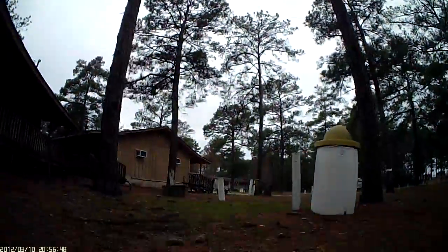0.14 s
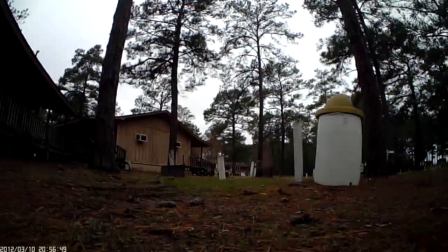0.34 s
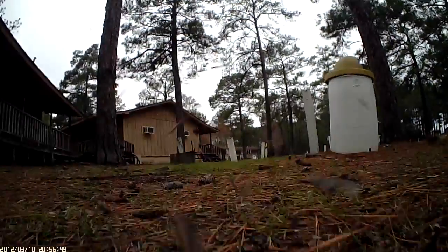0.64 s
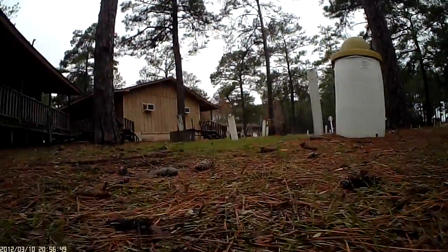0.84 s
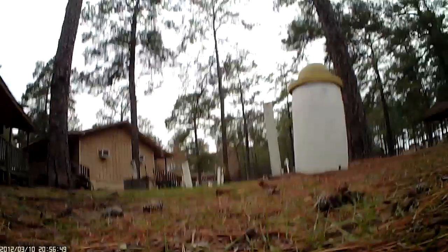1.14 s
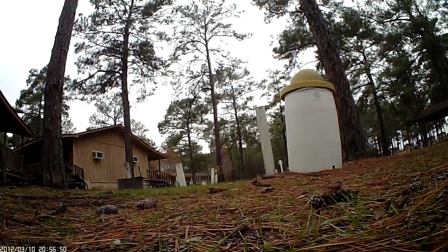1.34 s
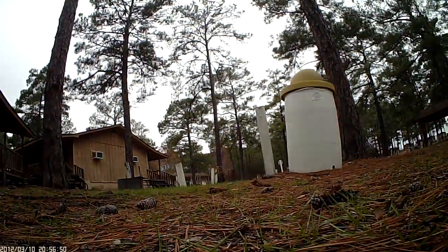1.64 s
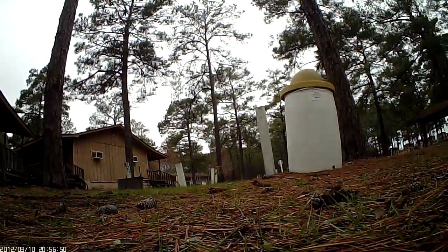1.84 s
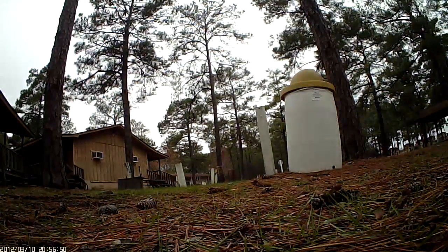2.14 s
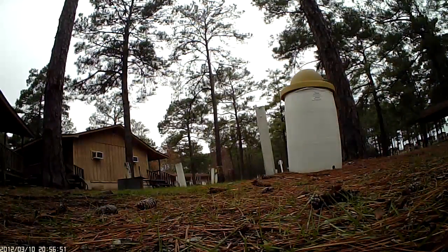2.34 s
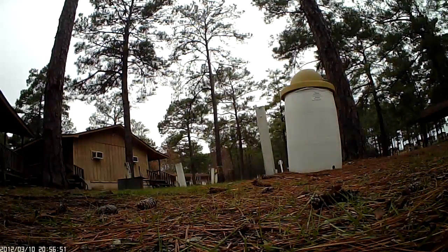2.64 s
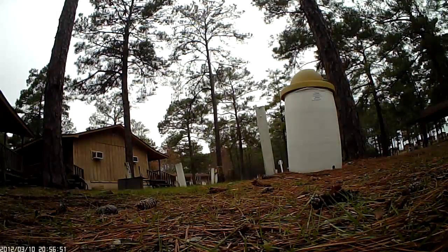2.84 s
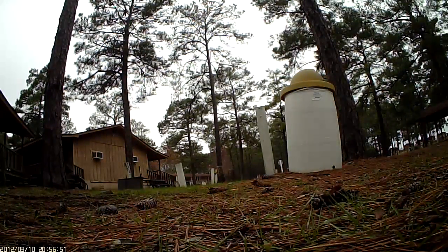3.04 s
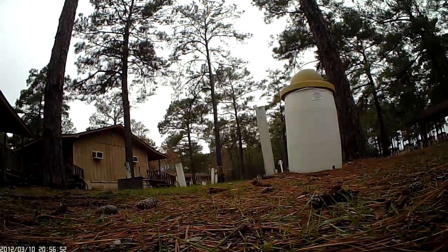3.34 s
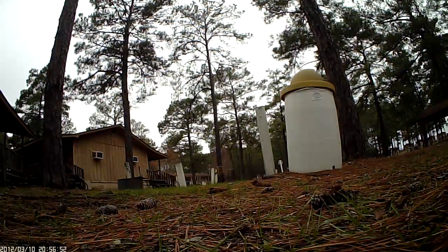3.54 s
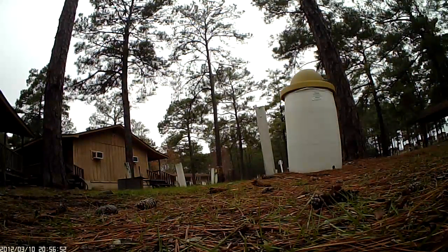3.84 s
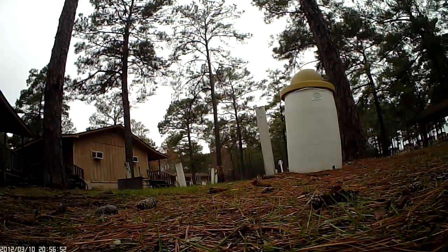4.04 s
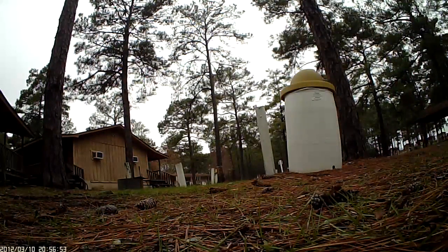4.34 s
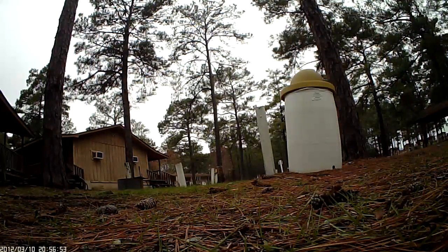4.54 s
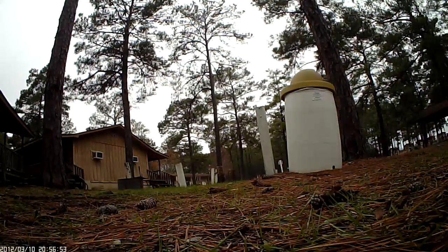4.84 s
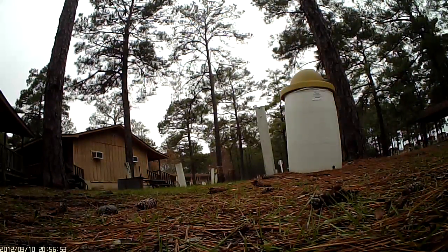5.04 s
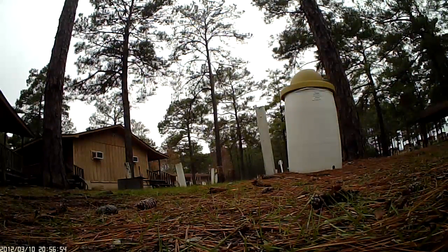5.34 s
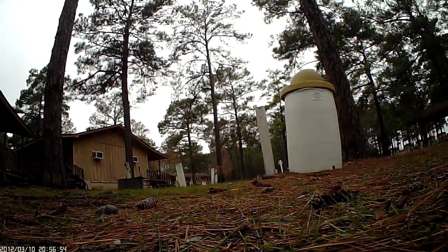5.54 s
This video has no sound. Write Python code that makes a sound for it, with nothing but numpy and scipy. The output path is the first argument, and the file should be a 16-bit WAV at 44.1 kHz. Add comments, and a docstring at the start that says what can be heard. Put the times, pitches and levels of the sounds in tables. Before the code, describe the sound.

A little multirotor lands on pine litter, recorded very close and dry through its own frame. Dissonant, nasal motor whine and airy propeller hiss come first, with thin chattering. Low knocks and a burst of gritty noise mark touchdown, followed by a rapid fall in pitch, a smaller second knock and brittle ticks. The bearings whirr down and stop, leaving a long quiet stretch of low, even electronic buzzing, faint hum and soft hiss.

```python
"""Small multirotor landing on pine litter

A small camera multirotor comes down and coasts to rest, heard by a microphone bolted to its frame.
Three motors whine as sums of shaft orders; bearing grit rings arms and housing, blades hiss, a loose part rattles.
It knocks down, bounces and loses power: slow pushes on the microphone and short noise bursts mark the blows.
Behind it lie the radio's bursts, buzzing through a leaky capacitor, a faint sensor hum and circuit hiss."""
import sys
import numpy as np
from scipy import signal
from scipy.fft import rfft, irfft
from scipy.io import wavfile
from scipy.ndimage import uniform_filter1d

SR = 44100
rng = np.random.default_rng(int(sys.argv[2]) if len(sys.argv) > 2 else 0)


def file_out(sig):
    """Save sig as 16-bit WAV at sys.argv[1]."""
    # one column per channel
    cols = np.atleast_2d(sig).T
    # limit, then scale
    lim = np.clip(cols, -1, 1)
    pcm = np.round(lim * 32767).astype(np.int16)
    wavfile.write(sys.argv[1], SR, pcm)


N = 251370

# one table a motor: (time [s], pole tone = 3 x shaft [Hz], pole tone level [dB], its 2nd multiple [dB],
# shaft throb [dB])
MOTORS = [
    [(0.0, 704.7, -39, -34.5, -39), (0.35, 706, -59, -41.5, -48), (0.54, 715, -39.5, -41, -57),
     (0.6, 647.4, -30, -34, -55), (0.71, 625, -35.5, -42, -54), (0.8, 528.4, -37, -45, -46),
     (0.88, 484, -34.5, -38.5, -41), (0.96, 400, -37, -41.5, -36), (1.0, 326.9, -46.5, -59, -59),
     (1.1, 211, -34.5, -50, -50), (1.2, 128.9, -40.5, -71, -39), (1.36, 99.2, -53, -65, -61)],
    [(0.0, 689.5, -32.5, -35.5, -36), (0.24, 683.7, -32.5, -45, -43), (0.33, 700.3, -32, -47, -35.5),
     (0.45, 659, -27, -36, -46.5), (0.54, 588, -36.5, -35, -37.5), (0.572, 531, -23.5, -45, -38),
     (0.62, 560.5, -57, -47, -32.5)],
    [(0.0, 797, -30.5, -37.5, -46), (0.2, 786.3, -30.5, -37, -41), (0.33, 770, -32.5, -29, -44),
     (0.42, 728, -33.5, -37.5, -47), (0.48, 718, -31, -29, -48), (0.54, 706.3, -32.5, -28.5, -46),
     (0.575, 876.4, -26, -28, -33), (0.6, 821, -26.5, -29, -42), (0.635, 679.7, -30.5, -24.5, -54),
     (0.7, 553.6, -34, -34.5, -51), (0.75, 525, -28, -44, -53), (0.81, 480, -50, -43, -56),
     (0.95, 363, -36.5, -46, -56), (1.0, 290, -46, -43, -60), (1.05, 229.8, -34, -55, -50),
     (1.12, 202.3, -55, -62, -49)],
]
# each motor's 3rd multiple against its 2nd, before the slowing loss: (level [dB])
THIRD_MULTIPLE_DB = [3.5, -4, -8]
# weaker orders against the pole tone, before the slowing loss: (shaft order [turns], level [dB])
SIDE_ORDERS = [(2, -19), (5, -22), (7, -20), (12, -12), (15, -12), (18, -17), (21, -18)]
# resonances of the arms: (frequency [Hz], width [Hz], relative level [dB])
ARM_MODES = [(1713, 79, 6), (1823, 40, 2.5), (1893, 100, -1), (2001, 59, 2.5)]
# bearing rumble in the arms: (time [s], level [dB])
ARM_RUMBLE = [(0.0, -37), (0.38, -44), (0.5, -25), (0.59, -20.5), (0.66, -30), (0.95, -30), (0.99, -25),
              (1.036, -37.5), (1.1, -28), (1.25, -33.5), (1.45, -47), (1.62, -55)]
# resonances of the housing: (frequency [Hz], width [Hz], relative level [dB])
HOUSING_MODES = [(3610, 150, -3), (4120, 390, -4.5), (4630, 590, -10), (4960, 204, -7)]
# joins the housing once on the ground: (frequency [Hz], width [Hz], level against the housing [dB])
BRACE = [(5227, 130, -6.5)]
# spectrum of the blade hiss: (frequency [Hz], relative density [dB per Hz])
WASH_SPECTRUM = [(150, -16.5), (250, -16), (313, -16.5), (614, -7.5), (692, -5), (867, -8.5), (1560, -3),
                 (8180, -24.5), (14500, -32), (15500, -49)]
# spectrum of air buffeting the microphone: (frequency [Hz], relative density [dB per Hz])
BUFFET_SPECTRUM = [(10, -28), (30, 1), (60, -3), (120, -4.5), (250, -11), (400, -10.5), (700, -46)]
# buffeting, rising near the ground: (time [s], level [dB])
DRAUGHT = [(0.0, -76), (0.33, -62), (0.41, -49), (0.7, -47), (0.78, -50), (0.93, -42), (1.2, -43.5),
           (1.45, -50.5), (1.62, -55)]
# bouts of a loose part being struck: (start [s], length [s], level [dB])
RATTLE_BOUTS = [(0.0, .042, -35), (0.049, 0.048, -35), (0.102, 0.17, -36), (0.297, 0.12, -40),
                (0.438, 0.088, -41), (0.554, 0.033, -41), (0.582, 0.043, -34.5), (.68, 0.064, -41.5),
                (0.853, .068, -37), (0.923, .058, -39.5)]
# resonances of the loose part: (frequency [Hz], width [Hz], relative level [dB])
LOOSE_PART = [(6440, 320, 7), (7200, 530, -2.5), (9170, 830, -7), (10650, 770, -5), (11970, 1100, 0.5),
              (13000, 730, -14)]
# thin ringing heard while coasting: (frequency [Hz], width [Hz], relative level [dB])
RIM_MODES = [(8700, 200, -3), (11600, 310, -6), (12450, 440, -2)]
# thin ringing: (time [s], level [dB])
COASTING = [(1.0, -62), (1.1, -51), (1.17, -60), (1.22, -48.5), (1.33, -58), (1.5, -72)]
# last ticks, nominal before filtering: (time [s], blow on the loose part [dB], blow on the frame [dB])
TICKS = [(0.9784, -20.5, -30), (1.0006, -36, -22.5), (1.0204, -35, -20.5), (1.0274, -28, -42),
         (1.055, -25.5, -32), (1.067, -38, -39), (1.08, -38, -44), (1.0895, -35, -48), (1.1082, -35, -38)]
# jolts on the ground: (time [s], peak level [dB], width [s], push 1 or pull -1 [sign])
THUMPS = [(.522, -21, .005, 1), (.5305, -21, .004, -1), (.5565, -8, .0036, 1), (.5582, -10, .0008, 1),
          (.5712, -10, .0022, 1), (.5795, -15, .003, -1), (.613, -21, .004, 1), (1.001, -23, .004, -1),
          (1.013, -14, .009, 1), (1.033, -22, .006, -1)]
# landing and bounce shake everything: (time [s], build-up [s], dying [s], strength [dB])
SHOCKS = [(.565, .04, 0.038, -0.5), (1.005, 0.055, 0.034, -13)]
# spectrum of the circuit hiss: (frequency [Hz], relative density [dB per Hz])
HISS_SPECTRUM = [(5, 6), (20, -3), (100, 5.5), (250, -1), (1000, -7.5), (4000, -15), (14000, -18),
                 (16500, -21.5)]

GROUND_S, CUT_S = .45, .983  # first touch; the power is cut
SHOCK_TREMBLE = 0.023  # share by which a shock of strength 1 unsettles the motor speed
GROUND_FLUTTER = 1.3  # factor on the order-dependent part of the flutter once grounded
HOUSING_DB, HOUSING_CUT_DB, HOUSING_COAST_DB_PER_S = -32, -4, -43.5  # under power, step at the cut, fall
WASH_DB, WASH_DB_PER_DECADE = -32.5, 17  # at the opening speed; change per decade of speed
HOUSING_SHOCK_DB, WASH_SHOCK_DB, BUFFET_SHOCK_DB = -38.5, -22.5, -24.5  # swell in a shock of strength 1
RATTLE_REST_DB, RATTLE_EDGE_S = -47, 0.013  # floor under power; smoothing of a bout's edges
WHISTLE_HZ, WHISTLE_DB = 14789, -39  # switching of the speed controllers; mean peak level
BURST_EVERY_S, BURST_FIRST_S, BURST_LONG_S = .009, .00614, .00265  # the radio's current bursts
COUPLING_S = 0.0013  # time constant of the coupling capacitor
SENSOR_CYCLE_HZ, SENSOR_THROB = 30.7, 0.11  # image sensor's cycle; share by which it throbs the bursts
BURST_DB, SENSOR_HUM_DB, HISS_DB = -35, -63, -51.5  # before they sink; burst step also before the throb
BAND_LIMIT_HZ = 16300


def motor(rows, third_db):
    """Whine at multiples of the shaft turn, trembling in speed and fluttering in strength."""
    gate, hz, pole_db, second_db, shaft_db = curves(rows)
    tremble = (.004 + SHOCK_TREMBLE * shocks()) * wander(hz=30)
    turns = np.cumsum(hz / 3 * (1 + tremble)) / SR
    slowing_db = 40 * np.log10(np.minimum(hz / 790, 1))  # the weaker orders die first as speed drops
    orders = [(1, shaft_db), (3, pole_db), (6, second_db), (9, second_db + third_db + slowing_db)]
    orders += [(order, pole_db + db + slowing_db) for order, db in SIDE_ORDERS]
    rough = 1 + (GROUND_FLUTTER - 1) * grounded()
    whine = np.zeros(N)
    for order, db in orders:
        flutter_db = (1.4 + .2 * order * rough) * wander(hz=35)  # higher orders flutter more
        whine += amp(db + flutter_db) * np.cos(2 * np.pi * (order * turns + rng.random()))
    return np.sqrt(2) * gate * whine  # makes the table levels rms


def spinning():
    """Gritty bearings ring the arms and the housing; the blades hiss; their draught shakes the microphone."""
    gate, arms_db = curves(ARM_RUMBLE)
    grit = rng.standard_normal((2, N)) * amp(2.2 * wander(hz=110))
    # each body rings through its modes, then one broad peak around them
    arms = evened(ring(ring(grit[0], ARM_MODES), [(1850, 700, 0)]))
    housing = evened(ring(ring(grit[1], HOUSING_MODES), [(4600, 2500, 0)]))
    brace_db = BRACE[0][2]
    housing = housing + grounded() * amp(brace_db) * evened(ring(ring(grit[0], BRACE), BRACE))
    coasting_s = np.maximum(np.arange(N) / SR - CUT_S, 0)
    housing_db = HOUSING_DB + HOUSING_CUT_DB * (1 - powered()) + HOUSING_COAST_DB_PER_S * coasting_s
    housing_gain = amp(housing_db) + amp(HOUSING_SHOCK_DB) * shocks()

    turning, hz = curves(MOTORS[0])[:2]
    wash_db = WASH_DB + WASH_DB_PER_DECADE * np.log10(hz / hz[0])
    wash_gain = turning * amp(wash_db) + amp(WASH_SHOCK_DB) * shocks()
    wash = noise(WASH_SPECTRUM) * amp(1.0 * wander(hz=122))
    buffet_gain = amp(curves(DRAUGHT)[1]) + amp(BUFFET_SHOCK_DB) * shocks()
    buffet = noise(BUFFET_SPECTRUM)
    return gate * (amp(arms_db) * arms + housing_gain * housing + wash_gain * wash + buffet_gain * buffet)


def rattle():
    """Chatter bursts each turn of the first motor (each pole once it coasts) ring a loose part and a rim."""
    t = np.arange(N) / SR
    rate_hz = curves(MOTORS[0])[1] / (1 + 2 * (t < CUT_S))
    turns = np.cumsum(rate_hz) / SR
    size = amp(2.0 * rng.standard_normal(N))[turns.astype(int)]  # one chance size a burst
    size = size * amp(1.0 * wander(hz=14))
    since_s = (turns % 1) / rate_hz
    chatter = size * (0.039 + np.exp(-since_s / 0.0016)) * rng.standard_normal(N)

    bouts = sum(amp(db) * ((t > s) & (t < s + length)) for s, length, db in RATTLE_BOUTS)
    soft_bouts = uniform_filter1d(bouts, max(round(RATTLE_EDGE_S * SR), 1))
    level = np.maximum(soft_bouts, amp(RATTLE_REST_DB) * powered())
    loose_part = evened(ring(ring(chatter, LOOSE_PART), [(10600, 8300, 0)]))
    gate, coasting_db = curves(COASTING)
    rim = evened(ring(ring(chatter, RIM_MODES), [(11000, 5000, 0)]))
    return level * loose_part + gate * amp(coasting_db) * rim


def ticks():
    """Blows as noise bursts, dying within milliseconds, ring the loose part and the frame."""
    s, part_db, frame_db = np.transpose(TICKS)
    blows = np.zeros((2, N))
    blows[:, np.round(s * SR).astype(int)] = amp([part_db, frame_db])
    decay = np.exp(-1 / (0.00083 * SR))
    burst = rng.standard_normal((2, N)) * signal.lfilter([1], [1, -decay], blows)
    # gains make up for what the resonances take away
    return 2.0 * ring(burst[0], LOOSE_PART) + 3.9 * ring(burst[1], [(4040, 950, 0)])


def thumps():
    """Each jolt pushes the microphone one way, with a smaller swing back on either side."""
    t = np.arange(N) / SR
    out = np.zeros(N)
    for s, db, width, direction in THUMPS:
        u = ((t - s) / width) ** 2
        out += direction * amp(db) * (1 - 2 * u) * np.exp(-u)
    return out


def whistle():
    """The controllers' switching as one thin sine, wavering in level while the power is on."""
    wavering = 1 + .35 * wander(hz=60)
    return powered() * amp(WHISTLE_DB) * wavering * np.sin(2 * np.pi * WHISTLE_HZ * np.arange(N) / SR)


def circuit():
    """Square current bursts leak in through a capacitor, each step sagging back, over sensor hum and hiss."""
    t = np.arange(N) / SR
    since = (t - BURST_FIRST_S) % BURST_EVERY_S
    # steep edges, at most two samples long
    square = np.clip(np.minimum(since, BURST_LONG_S - since) * SR / 2 + .5, 0, 1)
    cycle = np.sin(2 * np.pi * SENSOR_CYCLE_HZ * t)
    keep = np.exp(-1 / (COUPLING_S * SR))
    buzz = amp(BURST_DB) * signal.lfilter([1, -1], [1, -keep], square * (1 + SENSOR_THROB * cycle))
    return buzz + amp(SENSOR_HUM_DB) * cycle + amp(HISS_DB) * noise(HISS_SPECTRUM)


def shocks():
    """Strength of the shaking: each shock builds up and dies away exponentially."""
    t = np.arange(N) / SR
    return sum(amp(db) * np.exp(-np.maximum((s - t) / rise, (t - s) / fall)) for s, rise, fall, db in SHOCKS)


def powered():
    """1 until just before the power is cut, then 0 after a 5 ms slope."""
    return np.clip((CUT_S - np.arange(N) / SR) * 200, 0, 1)


def grounded():
    """0 in the air, rising to 1 within 33 ms of the first touch."""
    return np.clip((np.arange(N) / SR - GROUND_S) * 30, 0, 1)


def curves(rows):
    """A gate open from first row to last with 10 ms slopes (none at time 0), then each column by sample."""
    s, *columns = np.transpose(rows)
    t = np.arange(N) / SR
    opening = (t - s[0]) * 100 + (s[0] < .01)
    gate = np.clip(np.minimum(opening, (s[-1] - t) * 100), 0, 1)
    return gate, *(np.interp(t, s, column) for column in columns)


def ring(x, modes):
    """Sum of resonances, each of gain 1 at its centre before its level is applied."""
    return sum(amp(db) * signal.lfilter(*signal.iirpeak(hz, hz / width, SR), x) for hz, width, db in modes)


def noise(points):
    """Noise with the given spectrum, rms 1."""
    f, db = np.transpose(points)
    hz = np.fft.rfftfreq(N, 1 / SR)
    shape = amp(np.interp(np.log(hz + 1), np.log(f + 1), db))
    return evened(irfft(rfft(rng.standard_normal(N)) * shape, N))


def wander(hz):
    """Slow chance movement, mostly below hz, rms 1."""
    return noise([(1, 0), (hz, 0), (2 * hz, -40)])


def evened(x):
    """Scales to rms 1."""
    return x / np.sqrt(np.mean(x ** 2) + 1e-20)


def amp(db):
    """dB to gain."""
    return 10 ** (np.asarray(db) / 20)


def scene():
    """One microphone bolted to the frame; buzz, hum and hiss sink while the machine is loud."""
    motors = sum(motor(rows, db) for rows, db in zip(MOTORS, THIRD_MULTIPLE_DB))
    machine = motors + spinning() + rattle() + ticks() + thumps() + whistle()
    loud_db = 10 * np.log10(abs(uniform_filter1d(machine ** 2, size=8000)) + 1e-12)
    sink_db = -1.3 * np.maximum(loud_db + 31, 0)
    return (machine + amp(sink_db) * circuit())[None]


def record(dry):
    """The band limit: a steep low-pass."""
    low_pass = signal.firwin(511, BAND_LIMIT_HZ, window=("kaiser", 9), fs=SR)
    return signal.oaconvolve(dry, low_pass[None], "same")


dry = scene()
out = record(dry)
file_out(out)
```